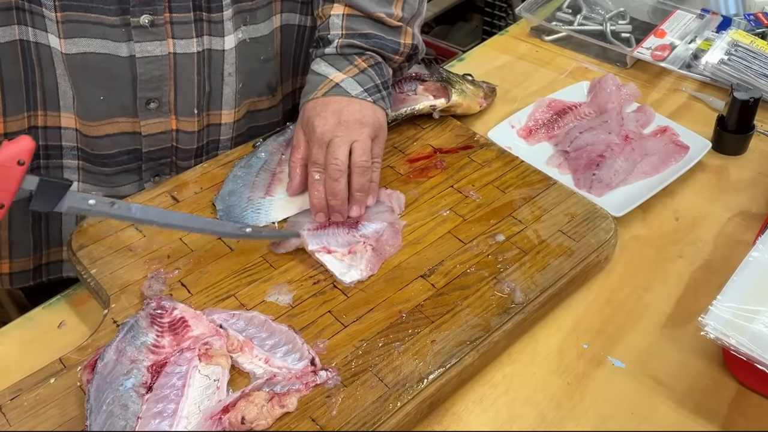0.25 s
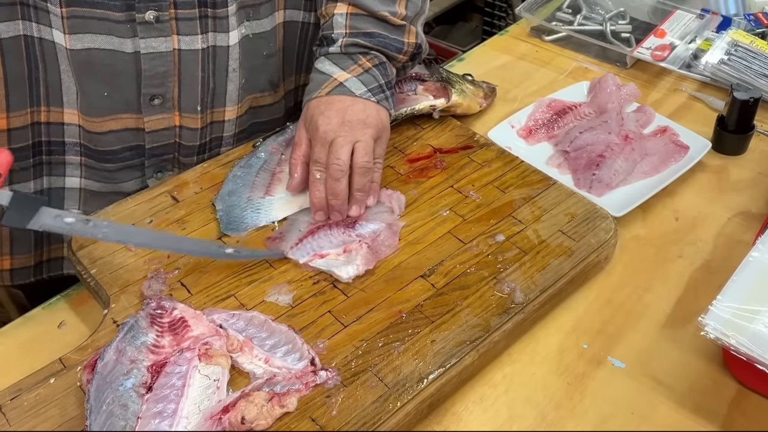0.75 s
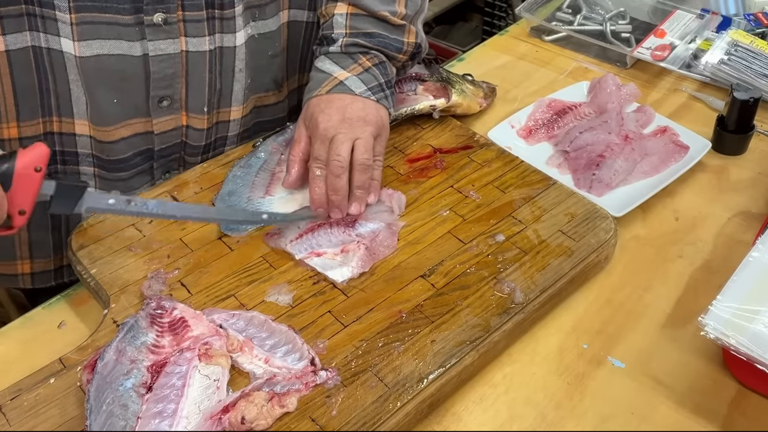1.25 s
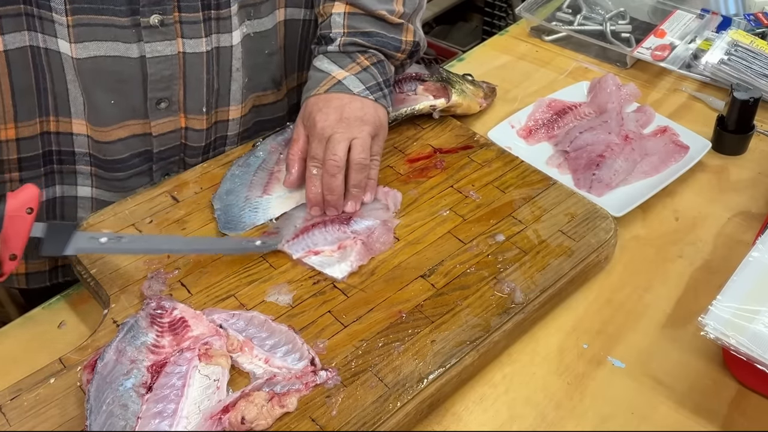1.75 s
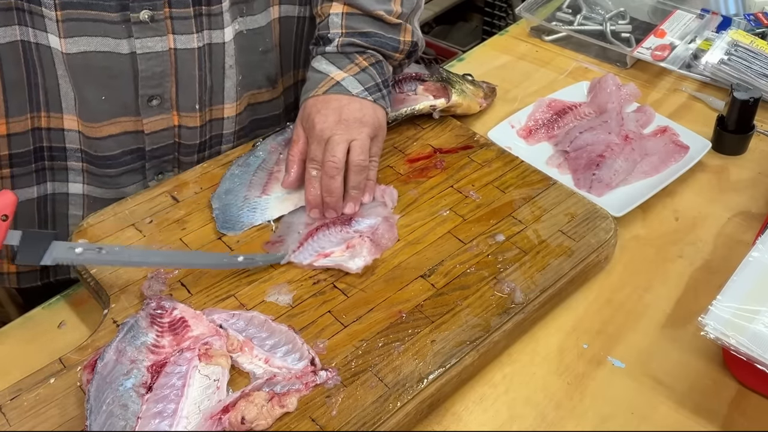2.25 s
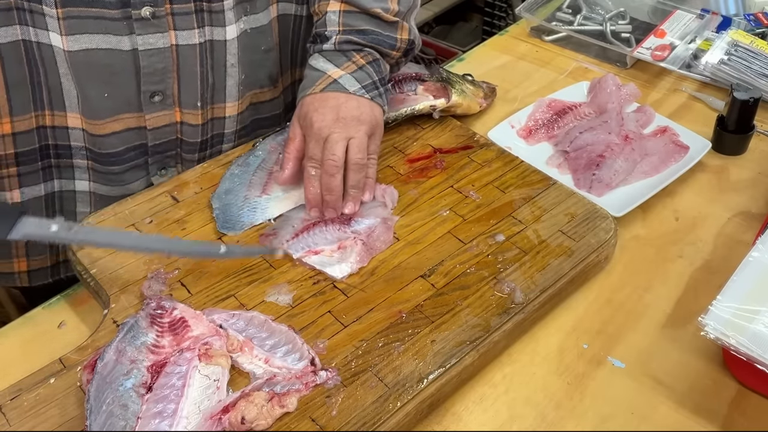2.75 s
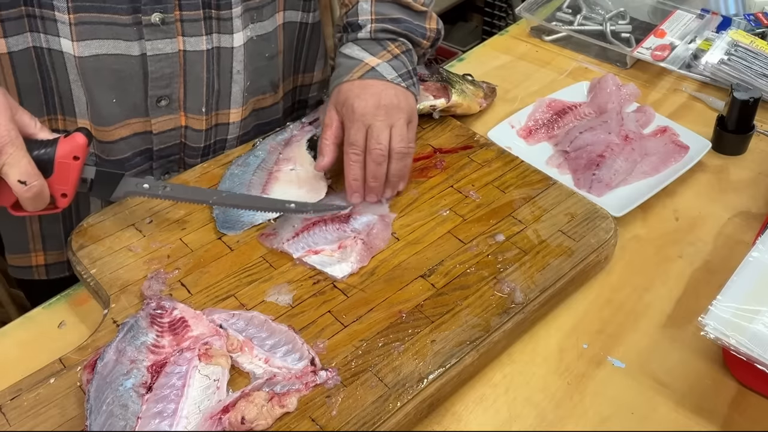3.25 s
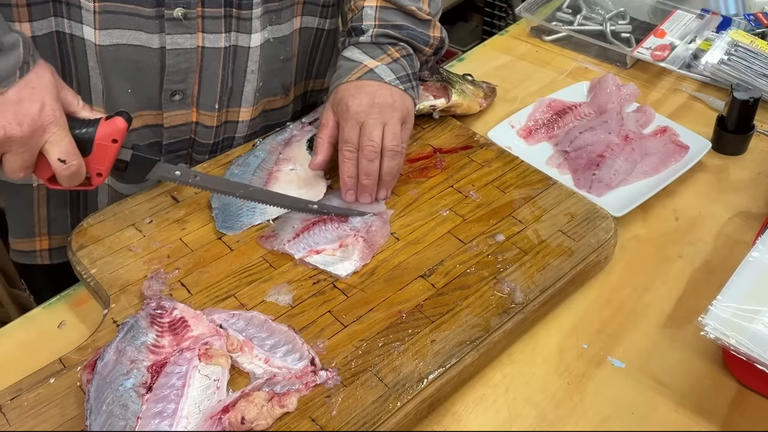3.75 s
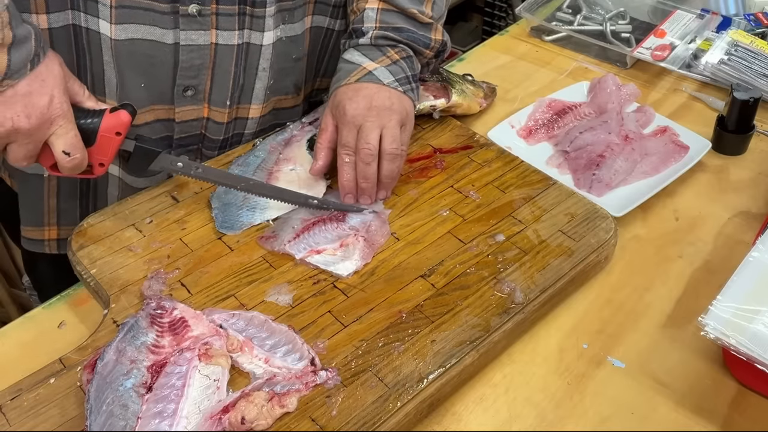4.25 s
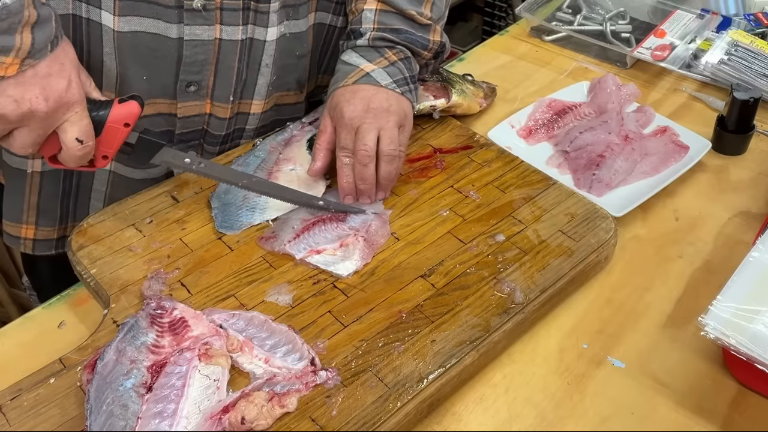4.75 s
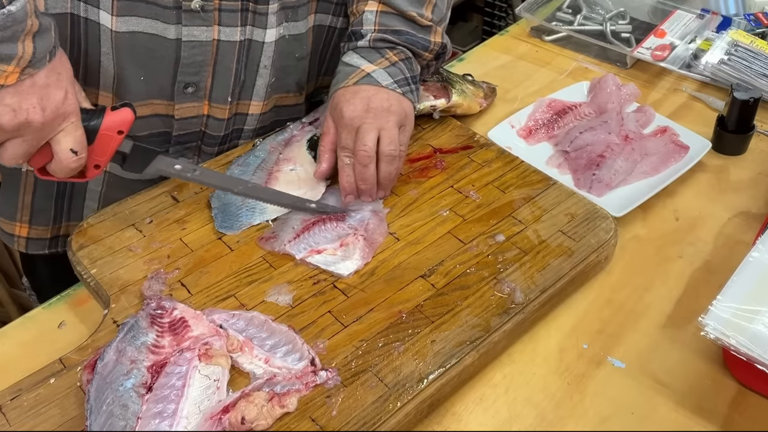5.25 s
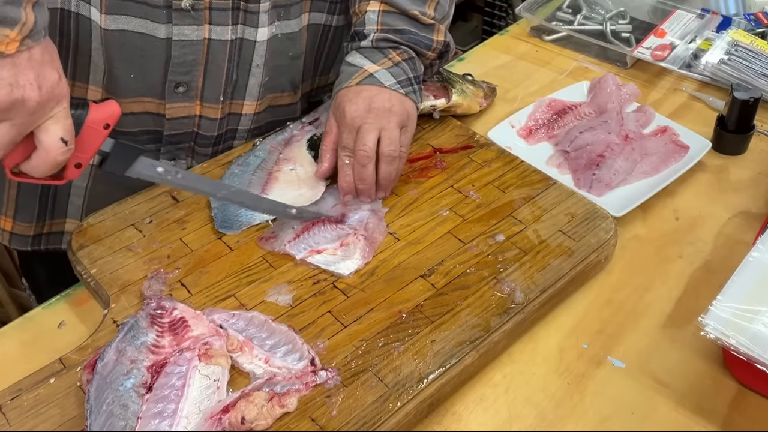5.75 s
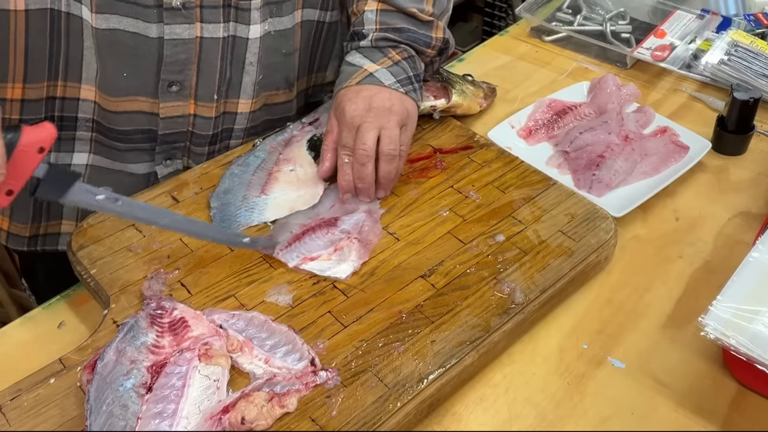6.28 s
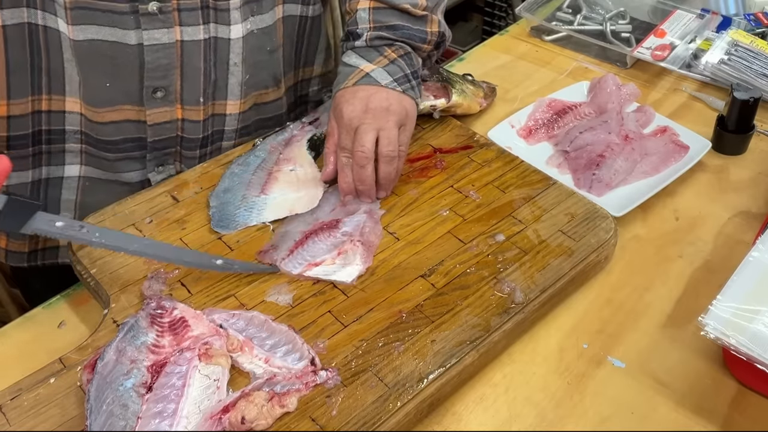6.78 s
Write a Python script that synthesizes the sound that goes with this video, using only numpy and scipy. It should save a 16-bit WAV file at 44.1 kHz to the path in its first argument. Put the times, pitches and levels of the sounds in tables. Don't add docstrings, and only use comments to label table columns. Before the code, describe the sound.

Small quiet room, close stereo pickup, the tool slightly left. At 0 s a cordless fillet knife is already running and winds down within about half a second, with a light click and handle rustle. At 0.58 s a sharp trigger snap starts a short bright whirring burst, a dull board knock near 0.83, off at 0.87 and coasting down. Quiet, faint rustle, then another hard snap at 1.59 and a steady one-second buzz with gear whine and rapid blade clatter; low board drumming swells around 2.5 before release at 2.6. Coast-down ends in small clicks near 2.8-3.0. From 3.1 to 4.5 only soft room tone, a faint high lamp tone and barely audible wet finger ticks. A tiny motor blip at 4.54, then at 4.8 the last run: from 5.05 heavy low drumming on wood, pitch sagging, knocks around 6.2-6.3, pressure easing near 6.65, then deep again to the cut-off around 7.

```python
import sys
import numpy as np
from scipy import signal
from scipy.fft import rfft, irfft, next_fast_len
from scipy.io import wavfile
from scipy.ndimage import uniform_filter1d, map_coordinates

SR = 44100
rng = np.random.default_rng(int(sys.argv[2]) if len(sys.argv) > 2 else 0)


def transcribe(signal):
    frames = np.atleast_2d(signal).T
    limited = np.clip(frames, -1, 1)
    pcm = np.round(limited * 32767).astype(np.int16)
    wavfile.write(sys.argv[1], SR, pcm)


def to_linear_factor(level_db):
    exponent = np.asarray(level_db, float) / 20
    return 10 ** exponent


N = 309582
TIME = np.arange(N) / SR
TEETH = 50
FULL_HZ = 2750


def unit(x):
    return x / np.sqrt(np.mean(x ** 2) + 1e-20)


def along(points, hz, axis=1):
    table = np.transpose(points)
    return np.interp(np.log(hz + 1), np.log(table[0] + 1), table[axis])


def curves(rows):
    s, *columns = np.transpose(rows)
    return [np.interp(TIME, s, column) for column in columns]


def wobble(rate):
    coarse = np.arange(0, N + 16, 16)
    knots = rng.standard_normal(int(N * rate / SR) + 4)
    return np.interp(np.arange(N), coarse, map_coordinates(knots, [coarse * rate / SR]))


def filtered(x, response):
    m = next_fast_len(N + SR // 2)
    return irfft(rfft(x, m) * response(np.fft.rfftfreq(m, 1 / SR)), m)[..., :N]


def coloured(x, spectrum):
    return unit(filtered(x, lambda hz: to_linear_factor(along(spectrum, hz))))


def steady(x):
    return x / np.sqrt(np.abs(uniform_filter1d(x ** 2, SR // 8)) + 1e-9)


def rattle(depth_db, spectrum, channels):
    return coloured(to_linear_factor(depth_db * wobble(350)) * rng.standard_normal((channels, N)), spectrum)


def knocks(strokes, t60, scatter_db, odd_db, spread):
    count = int(strokes[-1]) + 1
    draw = rng.standard_normal((count, 2))
    at = np.searchsorted(strokes, np.arange(count) + spread * draw[:, 0])
    kicks = np.zeros(N + 1)
    kicks[at] = to_linear_factor(scatter_db * draw[:, 1] + odd_db * (np.arange(count) % 2))
    t = np.arange(SR // 25) / SR
    burst = to_linear_factor(-60 * t / t60) * (1 - np.exp(-t / .0015)) ** 2
    return signal.fftconvolve(kicks, burst)[:N]


# on in seconds, off in seconds, coast-down in Hz of gear mesh per second,
# whir at full speed in dB, start jolt in dB.
PULLS = [
    (-.6, -.008, 5880, -33.5, -60),
    (.579, .865, 5300, -35, -37),
    (1.589, 2.605, 5600, -33, -32),
    (4.54, 4.558, 4800, -35, -47),
    (4.794, 7.2, 5000, -33.5, -49),
]
# time in seconds, gear mesh in Hz.
SPEED = [(0, 2800), (.6, 2910), (.9, 2910), (1.6, 2760), (2, 2750), (2.2, 2727), (2.4, 2745), (2.6, 2790),
         (4.8, 2760), (5, 2752), (5.3, 2685), (5.66, 2668), (5.9, 2694), (6.3, 2714), (6.46, 2698),
         (6.78, 2612), (6.94, 2670)]


def motor():
    idle_hz, spin_up_s, spin_up_shape, coast_shape = 60, .024, .7, 1.15
    running, = curves(SPEED)
    mesh_hz = np.full(N, float(idle_hz))
    for on, off, coast, *_ in PULLS:
        powered_s = np.clip(np.minimum(TIME, off) - on, 0, None)
        rising = running * (1 - np.exp(-(powered_s / spin_up_s) ** spin_up_shape))
        start = np.interp(off, TIME, rising)
        falling = start * np.clip(1 - coast * (TIME - off) / start, 0, 1) ** coast_shape
        mesh_hz = np.maximum(mesh_hz, np.where(TIME < off, rising, falling))
    return mesh_hz


CRANK = [0, 1.75, .66, 0, 1.6]


def crank(mesh_hz):
    on = np.array([row[0] for row in PULLS])
    pull = np.searchsorted(on, TIME) - 1
    count = np.cumsum(mesh_hz / TEETH) / SR
    before = np.interp(on, TIME, count)
    shift = 4 * np.arange(len(on)) + 2 * np.ceil(before / 2) - before + CRANK
    return count + shift[pull]


# time in seconds, pressure in dB over the whir, nearness in dB, steady share 0-1,
# rebound between reversals 0-1, unevenness of the two strokes in dB.
PRESS = [(0, -14, -2.5, 0, 0.4, 0), (.6, -16, 2.5, 0, 0, 4), (.68, -8.5, 0, 0.3, 0, -14),
         (.95, -17, -1, 0.07, 0, 35), (1.68, -10.5, -0.5, 0.66, 0, 5.5), (2.43, -8, 0, 0.46, 0, 17.5),
         (2.46, -2.5, 0.5, 0, 0.75, 18), (2.56, 3, -1.5, 0.5, 0.5, 4.5), (2.7, -12.5, -4.5, .1, 0, -21),
         (4.85, -8.5, -1, 0.06, 0, -7), (5.02, -4.5, -1, 1, 0.3, 7.5), (5.06, 4, 0, 1, 0.6, 1.5),
         (5.3, 7, 1, 0.98, 1, 3.5), (5.55, 8, -.5, 0.99, .15, 1), (6.2, 4, 1, 0.73, 0, 3.5),
         (6.34, 2, 1, 0.01, 0.8, 8), (6.66, -7, 3.5, 0.91, 0.65, 9), (6.98, 7, 0.5, 0.65, 0.2, -6)]
# time in seconds, half length in seconds, level in dB.
RUSTLES = [
    (0.458, 0.13, -61.5),
    (1.507, 0.1, -75),
    (3.07, 0.17, -72),
    (4.78, 0.035, -87),
]


def loudness(mesh_hz):
    jolt_rise_s, jolt_fall_s = .0025, .0083
    running, = curves(SPEED)
    on, off, _, level_db, jolt_db = np.transpose(PULLS)
    pull = np.searchsorted(on, TIME) - 1
    pressure_db, near_db, *_ = curves(PRESS)
    since = TIME - on[:, None]
    jolt = to_linear_factor(jolt_db) @ np.exp(-np.abs(since) / np.where(since < 0, jolt_rise_s, jolt_fall_s))
    spin = to_linear_factor(level_db[pull] + near_db) * (mesh_hz / FULL_HZ) ** 1.95
    rustle = sum(to_linear_factor(db) * np.exp(-((TIME - s) / half) ** 2) for s, half, db in RUSTLES)
    housing_db = -3 + .016 * (FULL_HZ - running)
    housing_db = housing_db + 1.0 * (TIME > off[pull])
    housing_db = housing_db + 3.5 * np.exp(-(TIME - on[pull]) / .085)
    return 20 * np.log10(spin + jolt + rustle), housing_db, 20 * np.log10(spin) + pressure_db


# frequency in Hz, level in dB per Hz.
CLACK = [(1500, -35), (2600, -3.5), (3600, 1.5), (5000, 2), (6500, -1), (8500, -5), (11500, -18),
         (14000, -19), (15500, -48)]
# frequency in Hz, level in dB per Hz.
WHIR = [(1060, -36), (1800, -10.5), (2190, -1), (2680, 1), (3200, -1.5), (5030, -1), (5750, -6.5),
        (6530, -3.5), (7210, -16.5), (8320, 0.5), (10300, -18.5), (13200, -12.5), (13900, -18),
        (15500, -52)]


def whir_and_clack(strokes, clack_db):
    reversals = knocks(strokes, t60=.016, scatter_db=1.3, odd_db=-2.2, spread=.025)
    clack = reversals * rattle(0, CLACK, channels=3)
    return steady(rattle(2, WHIR, channels=3) + to_linear_factor(clack_db + 25.5) * clack)


# frequency in Hz, level in dB per Hz.
HOUSING = [(180, -25), (300, -10.5), (354, -13), (432, -10.5), (560, -8.5), (700, -8), (800, -2),
           (900, -6.5), (1110, -3), (1910, -6), (2400, -23.5), (3120, -51.5), (5280, -120)]


def housing(strokes, mesh_hz, power, clack_db):
    shaft_turns = 19
    mode_hz, half_width_hz = 520, 16
    kicks = knocks(strokes + .33, t60=.039, scatter_db=1.5, odd_db=-3.5, spread=.079)
    thrust = 1 + to_linear_factor(clack_db + 15) * kicks
    shaft = to_linear_factor(-9.5 + 3 * wobble(6)) * np.sin(shaft_turns * np.pi * strokes + .25 * wobble(15))
    detune = (shaft_turns * mesh_hz / TEETH / 2 - mode_hz) / half_width_hz
    return steady(thrust * rattle(1, HOUSING, channels=1)[0]) + power * shaft / (1 + detune ** 2)


WHINE = [1, 2, 3, 3.235]
# frequency in Hz, level in dB under the whir.
SHELL = [(2000, -24), (2750, -19), (2900, -9), (3600, -20), (4500, -12), (5200, -10), (5450, -12),
         (5800, -12), (7600, -24), (8230, -10), (8500, -22), (9500, -30)]


def tooth_whine(turn, mesh_hz):
    whine = 0
    for k in WHINE:
        level = to_linear_factor(along(SHELL, k * mesh_hz) + 3 * wobble(14))
        whine = whine + level * np.sin(2 * k * TEETH * turn + .45 * wobble(40))
    return whine


# frequency in Hz, width in Hz, level in dB under the whir.
HOLLOWS = [
    (4450, 350, -8),
    (1120, 81, -16.5),
]


def hollows(mesh_hz):
    ring = 0
    for hz, width, db in HOLLOWS:
        band = signal.butter(2, [hz - width / 2, hz + width / 2], "band", fs=SR, output="sos")
        ring = ring + to_linear_factor(db) * unit(signal.sosfilt(band, rng.standard_normal(N)))
    return np.clip(1.15 - mesh_hz / FULL_HZ, 0, 1) * ring


# frequency in Hz, level in dB per Hz.
BOARD = [(25, -33), (42, -2), (157, -2), (266, -7.5), (344, -6), (437, -22), (500, -22), (650, -43.5),
         (1100, -120)]
# multiple of the crank turn, level in dB.
DRUM = [(1, -48), (2, 0.5), (3, -23), (4, 2), (5, -20), (6, -1), (7, -35), (8, -7), (9, -21), (10, -7),
        (11, -15), (12, -11), (13, -3.5), (14, -10), (16, -24), (20, -19), (22, -21), (24, -20), (32, -13),
        (40, -17), (42, -19)]
PUSH = [(2, 0), (4, .2), (6, -.6), (8, 1.3), (10, -2.5), (12, 1.05)]


def board(turn):
    share, rebound, uneven_db = curves(PRESS)[2:]
    share, drum = np.clip(share, 0, 1), 0
    for k, db in DRUM:
        thinned = 1 - np.clip(rebound, 0, 1) * (k in (4, 12))
        level = thinned * to_linear_factor(db + k % 2 * uneven_db + 1.06 * wobble(7))
        drum = drum + level * np.cos(k * turn + dict(PUSH).get(k, 0) + .57 * wobble(9))
    shake = coloured(rng.standard_normal(N) * to_linear_factor(2.45 * wobble(25)), BOARD)
    return np.sqrt(share) * steady(drum) + np.sqrt(1 - share) * shake


def knife():
    mesh_hz = motor()
    running, = curves(SPEED)
    power = (running - 2550) / 220 * np.clip((mesh_hz / running - .62) / .2, 0, 1)
    clack_db = -4.5 + .005 * (FULL_HZ - running) - 9 * np.clip(1 - mesh_hz / 900, 0, 1)
    whir_db, housing_db, board_db = loudness(mesh_hz)
    strokes = crank(mesh_hz)
    turn = np.pi * strokes
    whir = whir_and_clack(strokes, clack_db)
    buzz = to_linear_factor(housing_db - 1.03) * housing(strokes, mesh_hz, power, clack_db)
    air = to_linear_factor(whir_db - 1) * (whir[0] + power * tooth_whine(turn, mesh_hz) + hollows(mesh_hz) + buzz)
    scattered = to_linear_factor(whir_db - 4) * whir[1:]
    return air, scattered, to_linear_factor(board_db - .3) * board(turn - .4)


# frequency in Hz, level in dB per Hz.
FLOOR = [(15, -40), (25, -9.5), (43, -4.5), (129, -13), (160, -20), (762, -27), (1340, -32.5),
         (1570, -28.5), (2100, -29), (2500, -37), (3800, -39.5), (5500, -34), (7000, -44), (8810, -47),
         (11800, -50.5), (15500, -57)]
# frequency in Hz, left-right likeness from -1 to 1.
FLOOR_ALIKE = [(60, 0.92), (380, -0.31), (2380, 0.39), (15000, -0.26)]


def floor():
    turn = lambda hz: np.arccos(np.clip(along(FLOOR_ALIKE, hz), -1, 1)) / 2
    pair = rng.standard_normal((2, N)) * to_linear_factor(.72 * wobble(20))
    mid, side = filtered(pair, lambda hz: to_linear_factor(along(FLOOR, hz)) * [np.cos(turn(hz)), np.sin(turn(hz))])
    return to_linear_factor(-65) * np.array([mid + side, mid - side]) / np.std(mid)


def lamp():
    return to_linear_factor(-92) * np.sin(2 * np.pi * 8190 * TIME)


def clicks(events, gain_db, crack, width):
    out, t = np.zeros(N + SR), np.arange(SR // 5) / SR
    for s, db, hz, t60 in events:
        band = signal.butter(1, [hz / width, min(hz * width, 15000)], "band", fs=SR, output="sos")
        ring = np.sin(2 * np.pi * hz * t) + crack * signal.sosfilt(band, rng.standard_normal(len(t)))
        envelope = to_linear_factor(db + gain_db - 60 * t / t60) * (1 - np.exp(-t * hz * .63))
        out[round(s * SR):][:len(t)] += envelope * ring
    return out[:N]


# time in seconds, peak in dB, pitch in Hz,
# t60 in seconds.
SNAPS = [(0.164, -28.5, 5130, 0.0081), (0.5799, -11, 3430, 0.004), (1.1707, -41, 4360, 0.0066),
         (1.5899, -10.5, 3810, 0.0053), (2.77, -33, 5570, 0.0054), (2.8, -29.5, 4510, 0.006),
         (2.8878, -34.5, 4950, 0.0068), (2.9617, -41, 4000, 0.008), (4.5385, -46, 1620, 0.0067),
         (4.5567, -31.5, 4370, 0.0084), (4.6016, -35.5, 10820, 0.015), (4.6722, -32.5, 4700, 0.0074),
         (4.7726, -50, 5320, 0.0049), (4.7885, -37.5, 1540, 0.0066)]


def snaps_and_clacks():
    return clicks(SNAPS, gain_db=3, crack=2.7, width=1.16)


# time in seconds, peak in dB,
# pitch in Hz, t60 in seconds.
BUMPS = [(.36, -54, 88, 0.21), (.495, -49, 143, .12), (.53, -47, 111, 0.13), (.83, -23, 129, 0.065),
         (2.452, -31, 166, 0.14), (2.497, -25, 221.3, 0.29), (3.162, -43, 55, 0.29),
         (4.61, -49, 89.5, 0.21), (.615, -37, 540, 0.087), (1.625, -39, 528, 0.11), (4.83, -40, 540, 0.087),
         (4.55, -38, 1130, 0.042), (4.797, -40, 1120, .08), (4.73, -45, 108, .15), (6.19, -25, 213.5, 0.24),
         (6.27, -26.5, 234.6, 0.23), (6.33, -24.5, 150, 0.16), (6.705, -29.5, 223, 0.21)]


def board_bumps():
    return clicks(BUMPS, gain_db=2, crack=0, width=1.5)


# time in seconds, peak in dB, pitch in Hz, t60 in seconds.
TICKS = [(3.1351, -60, 5610, 0.01), (3.2628, -61, 4380, 0.01), (3.2928, -60, 5870, 0.01),
         (3.3053, -57, 5490, 0.01), (3.3691, -59, 6050, 0.01), (3.5617, -64, 4570, 0.01),
         (3.5831, -62, 5840, 0.01), (3.6515, -58, 5130, 0.01), (3.7223, -68, 4790, 0.01),
         (3.7906, -67, 5410, 0.01), (3.8545, -67, 5770, 0.01), (3.873, -59, 5300, 0.01),
         (3.8934, -63, 5500, 0.01), (3.9443, -63, 5330, 0.01), (3.9942, -61, 5450, 0.01),
         (4.079, -57, 6320, 0.01), (4.1019, -63, 6170, 0.01), (4.1473, -61, 5610, 0.01),
         (4.3155, -64, 6120, 0.01), (4.3618, -65, 8000, 0.01), (4.3618, -47, 5440, 0.01),
         (4.4018, -64, 5600, 0.01), (4.4277, -62, 5900, 0.01), (4.4841, -60, 4990, 0.01)]


def finger_ticks():
    return clicks(TICKS, gain_db=-3, crack=2.5, width=1.5)


# frequency in Hz, left minus right in dB.
LEAN = [(60, 0.5), (130, -1.5), (290, 1), (640, 13), (1410, 1.5), (3100, -3.5), (6820, 1.5), (15000, 2.5)]
# frequency in Hz, radians the left port leads.
LEAD = [(60, .05), (430, 1.43), (1120, 0.53), (2240, 3.22), (4650, 5.61), (7750, 8.1), (15000, 15.1)]


def ports(x):
    half = lambda hz: to_linear_factor(along(LEAN, hz) / 2) * np.exp(.5j * along(LEAD, hz))
    return filtered(x, lambda hz: np.array([half(hz), 1 / half(hz)]))


# frequency in Hz, level in dB, t60 in seconds.
ROOM = [(150, -9.5, 0.1), (403, 2.5, 0.49), (1002, -2, 0.15), (4000, -5, 0.31), (8230, 2.5, 0.16),
        (13900, -17.5, .07)]


def room(x):
    hz, t, z = signal.stft(rng.standard_normal((2, SR // 3)), SR, nperseg=256)
    decay = to_linear_factor(-60 * t / along(ROOM, hz, axis=2)[:, None])
    tail = signal.istft(z * decay, SR, nperseg=256)[1]
    tail = np.pad(tail, ((0, 0), (150, 0)))
    tail = filtered(tail, lambda f: to_linear_factor(along(ROOM, f)) * np.sqrt(.099 / along(ROOM, f, axis=2)))[:, :SR // 2]
    return signal.fftconvolve(x[None], tail / np.sqrt(.2 * SR / np.log(1e6)), axes=1)[:, :N]


def scene():
    air, scattered, table = knife()
    air = air + snaps_and_clacks() + finger_ticks()
    table = table + board_bumps()
    direct = ports(air + table + lamp())
    return direct + scattered + room(air + to_linear_factor(-2) * table) + floor()


def roll_off(x):
    return signal.sosfilt(signal.butter(12, 15720, fs=SR, output="sos"), x)


def record(dry):
    return roll_off(dry)


dry = scene()
out = record(dry)
transcribe(out)
```